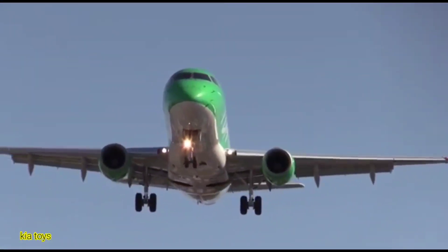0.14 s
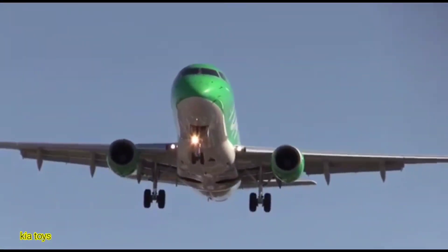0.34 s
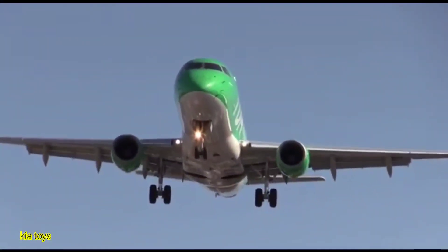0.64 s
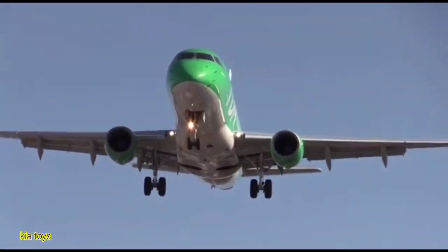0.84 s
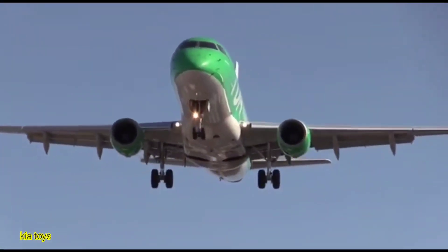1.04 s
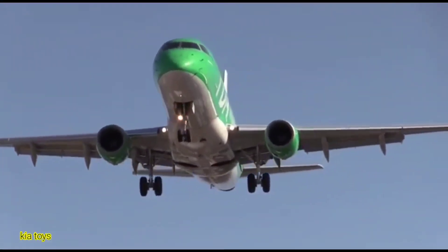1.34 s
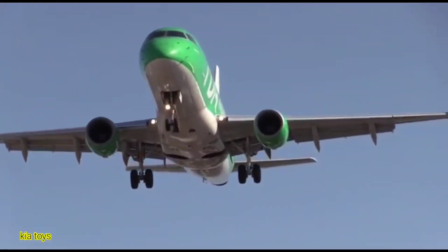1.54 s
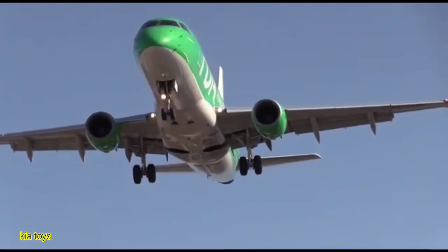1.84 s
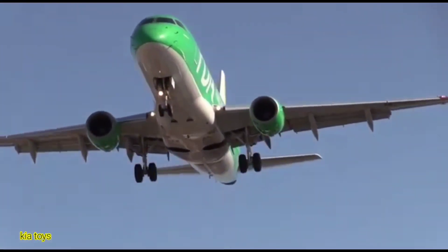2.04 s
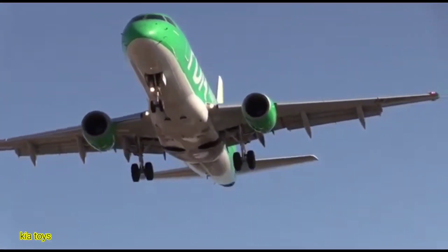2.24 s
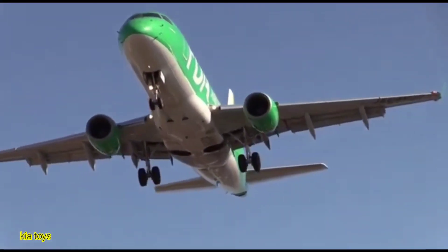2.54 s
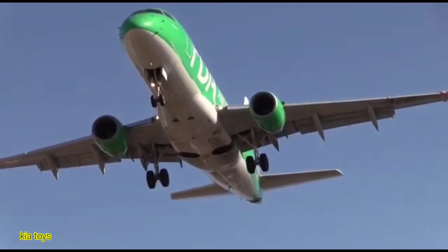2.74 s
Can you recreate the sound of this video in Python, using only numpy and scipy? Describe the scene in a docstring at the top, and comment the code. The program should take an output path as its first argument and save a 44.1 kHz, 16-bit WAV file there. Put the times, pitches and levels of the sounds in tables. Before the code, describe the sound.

A jet airliner passes low overhead, roaring and whining, with wind gusts thumping the microphone

```python
"""Under the approach path of an airport, a jet airliner passes low overhead of a two-port microphone.
Its roar, rush and hiss are turbulent noise that swells, fades and brightens as it nears, with an echo
off the ground. Beating fan tones and turbine tones are wavering sines that sag slightly in pitch.
Wind buffets the microphone as low noise, and the two hardest gusts thump and tick; the aircraft's
level dips after each."""
import sys
import numpy as np
from scipy import signal
from scipy.fft import rfft, irfft
from scipy.io import wavfile
from scipy.ndimage import uniform_filter1d

SR = 44100
rng = np.random.default_rng(int(sys.argv[2]) if len(sys.argv) > 2 else 0)


def store_pcm(level_fs):
    """Save levels as 16-bit WAV."""
    pcm = np.round(np.clip(level_fs, -1, 1) * 32767).astype(np.int16)
    wavfile.write(sys.argv[1], SR, np.atleast_2d(pcm).T)


N = 127890
T = np.arange(N) / SR  # seconds

# Treble lost in the air on the way, above the pivot; a loss below zero lifts the treble.
# Each row: time in seconds, loss in dB per kHz.
AIR_LOSS_CURVE = [(0, 6), (.55, 4), (.9, 6), (1.2, 2.5), (1.5, 2), (1.9, 2.5), (2.05, 2.2), (2.25, 1.1),
                  (2.55, 0.33), (2.9, -1)]
HISS_PIVOT_HZ = 2980
# Shape of the steady hiss, also used for the ticks. Each row: frequency in Hz, relative dB per Hz.
FLOOR_SPECTRUM = [(5000, 5.5), (15000, -5.5)]
HIGH_SHIFT = 0.4  # share of the pitch shift that the high tones and the fans' octave take


def amp(db):
    """Decibels to gain."""
    return 10 ** (np.asarray(db) / 20)


def unit(x):
    """Scales to an rms of one."""
    return x / np.sqrt(np.mean(abs(x) ** 2) + 1e-20)


def curve(points, t=T):
    """Reads a table along time."""
    return np.interp(t, *np.transpose(points))


def colour(points, hz):
    """Reads a table along log frequency."""
    table_hz, value = np.transpose(points)
    return np.interp(np.log(hz + 1), np.log(table_hz), value)


def drift(rate_hz):
    """Slow random motion of rms one: noise under a bell-shaped low-pass, without its mean."""
    hz = np.fft.rfftfreq(N, 1 / SR)
    low_pass = np.exp(-.5 * (hz / rate_hz) ** 2) * (hz > 0)
    return unit(irfft(rfft(rng.standard_normal(N)) * low_pass, N))


def swell(s, spread_s, db):
    """A bell-shaped rise and fall that peaks at s seconds."""
    return amp(db) * np.exp(-.5 * ((T - s) / spread_s) ** 2)


def pair(mid, side, likeness):
    """Left and right signals of a given likeness."""
    c = np.clip(likeness, 0, 1)
    return np.sqrt((1 + c) / 2) * mid + np.sqrt((1 - c) / 2) * np.array([side, -side])


def flow(spectrum, patchy_db, absorbed=False, size=1024):
    """Turbulent noise in drifting patches, combed by the ground echo and dulled by the air if asked."""
    # Left-right likeness. Each row: frequency in Hz, likeness from 0 to 1.
    likeness = [(100, 0.99), (500, 1), (2000, 0.96), (5200, 0.98), (6000, .9995)]
    # Delay of the echo off the ground. Each row: time in seconds, delay in ms.
    echo_delay = [(1.5, 1.5), (2.25, 2.15), (2.55, 2.8), (2.9, 3.34)]
    echo_share, echo_top_hz = 0.13, 1390

    hop = size // 4
    t = np.arange(N // hop + 5) * hop / SR
    hz = np.fft.rfftfreq(size, 1 / SR)
    a, b, c, d, patches = rng.standard_normal((5, len(t), len(hz)))
    patches = uniform_filter1d(patches, size=12, axis=0)  # smooth along time
    patches = unit(uniform_filter1d(patches, size=9, axis=1))  # and along frequency
    z = pair(a + 1j * b, c + 1j * d, colour(likeness, hz))
    z = z * amp(colour(spectrum, hz) + patchy_db * patches)

    # the delayed copy is weaker towards the treble
    echo_gain = echo_share / (1 + (hz / echo_top_hz) ** 2)
    delay_s = curve(echo_delay, t)[:, None] / 1000
    z = z * abs(1 + echo_gain * np.exp(2j * np.pi * hz * delay_s))
    if absorbed:
        khz_above = np.maximum(hz - HISS_PIVOT_HZ, 0) / 1000
        z = z * amp(-curve(AIR_LOSS_CURVE, t)[:, None] * khz_above)
    noise = signal.istft(z.transpose(0, 2, 1), nperseg=size, noverlap=size - hop)[1]
    return unit(noise[:, :N])


def tone(hz, width_hz, shift, flutter=0.5):
    """A blade tone with a wavering pitch, beating against its own scattered copies."""
    # Closing speed as a pitch shift, of which each tone takes its share.
    # Each row: time in seconds, shift in per cent.
    doppler = [(0, 0.47), (.5, 0.33), (1.0, 0.17), (1.9, 0.095), (2.4, -.25), (2.9, -0.56)]
    scatter_hz = 13  # how fast the air scatters the tones

    waver = .5 * width_hz * drift(2 * width_hz)
    pitch = hz * (1 + shift * curve(doppler) / 100) + waver
    paths = unit(1 + flutter * (drift(scatter_hz) + 1j * drift(scatter_hz)))
    turns = np.cumsum(pitch) / SR + rng.random()
    return np.sqrt(2) * (paths * np.exp(2j * np.pi * turns)).real


def airframe():
    """The low roar of flaps, gear and exhaust, the hollow howl above it and the exhaust rumble."""
    # Levels through the pass; the rumble opens up as the engines come over.
    # Each row: time in seconds, level in dB (the howl sounds 0.66 dB under its rows).
    roar_level = [(0, -29), (.12, -28.5), (.24, -24.5), (.3, -35.5), (.42, -27.5), (.62, -29.5),
                  (.7, -37.5), (1.0, -32.5), (1.25, -34), (1.6, -27.5), (1.78, -24.5), (2.1, -23),
                  (2.5, -23.5), (2.9, -24)]
    howl_level = [(0, -25.5), (.2, -26), (.29, -32), (.48, -26.5), (.62, -29.5), (.7, -37), (1.3, -31.5),
                  (1.65, -26), (1.95, -20), (2.26, -18.5), (2.45, -27.5), (2.62, -29.5), (2.9, -25.5)]
    rumble_level = [(1.1, -45.5), (1.45, -36), (1.8, -34.5), (2.3, -39.5), (2.55, -31.5), (2.9, -29)]
    # Their spectra. Each row: frequency in Hz, relative dB per Hz.
    roar_spectrum = [(40, 2.5), (110, -5), (170, -1), (250, 1.5), (370, 3), (480, -5.5), (700, -23),
                     (1500, -68)]
    howl_spectrum = [(200, -78), (350, -5), (470, 1), (650, 0.5), (750, -6), (880, -22.5), (1200, -20.5),
                     (2500, -69.5)]
    rumble_spectrum = [(50, -29.5), (100, -14), (150, -7.5), (210, -11.5), (300, -10.5), (450, -25),
                       (1000, -68)]

    roar = amp(curve(roar_level)) * flow(roar_spectrum, patchy_db=1.0)
    howl = amp(curve(howl_level) - 0.66) * flow(howl_spectrum, patchy_db=1.0)
    rumble = amp(curve(rumble_level)) * flow(rumble_spectrum, patchy_db=4.5)
    return roar + howl + rumble


def engines():
    """The mid-range rush, the intake hiss with the turbine tones riding on it, and the fans."""
    # Levels through the pass. Each row: time in seconds, level in dB
    # (the rush sounds 2 dB and the hiss 1.08 dB over its rows).
    rush_level = [(0, -36.5), (.09, -31.5), (.23, -28), (.29, -32), (.42, -25.5), (.57, -29), (.635, -29.5),
                  (.67, -36), (.85, -36), (1.08, -40), (1.33, -41), (1.64, -30), (1.79, -24), (1.95, -21),
                  (2.05, -22), (2.12, -24.5), (2.4, -27.5), (2.9, -28)]
    hiss_level = [(0, -45.5), (.12, -38), (.21, -43), (.3, -53), (.51, -42.5), (.63, -45.5), (.7, -52),
                  (.96, -39), (1.08, -49.5), (1.2, -50), (1.58, -42), (1.74, -31.5), (1.87, -34),
                  (2.01, -27), (2.06, -27), (2.16, -34), (2.4, -32.5), (2.7, -31.5), (2.9, -35)]
    # Their spectra. Each row: frequency in Hz, relative dB per Hz.
    rush_spectrum = [(400, -8.5), (750, 2.5), (950, 0.5), (1300, -0.5), (1750, -2), (2150, -7), (2450, -16),
                     (3200, -21.5), (6000, -74)]
    hiss_spectrum = [(1200, -16.5), (2200, 4.5), (2600, -1.5), (3200, -2), (3900, -5.5), (5400, -9),
                     (6300, -17), (8500, -23.5), (10500, -32.5), (15000, -50.5)]
    # Level added to all turbine tones. Each row: time in seconds, level in dB.
    beam = [(.7, -6), (.9, 0), (1.4, -4), (1.62, -1), (2.03, -2), (2.2, -2), (2.45, 3), (2.9, 3)]

    rush = amp(2.0) * flow(rush_spectrum, patchy_db=1.0)
    hiss = amp(1.08) * flow(hiss_spectrum, patchy_db=2.0, absorbed=True)
    hiss = hiss + amp(curve(beam)) * turbine()
    return amp(curve(rush_level)) * rush + amp(curve(hiss_level)) * hiss + fans()


def turbine():
    """High fan and turbine tones, dulled by a share of the treble loss in the air."""
    # Each row: pitch in Hz before the shift, level in dB before the air loss, width of the waver in Hz.
    high_tones = [(5375, -27, 30), (5570, -30, 35), (7588, -28.5, 35), (9745, -35, 45), (11930, -46, 55)]
    loss_share = 0.43

    total = 0
    for hz, db, width_hz in high_tones:
        loss_db = loss_share * curve(AIR_LOSS_CURVE) * max(hz - HISS_PIVOT_HZ, 0) / 1000
        total = total + tone(hz, width_hz, HIGH_SHIFT) * amp(db - loss_db)
    return total


def fans():
    """Two fans at slightly different speeds beat; their octave and a lower whine come and go."""
    # The two main whines. One row each: pitch in Hz before the shift, width of the waver in Hz,
    # share of the pitch shift.
    fan_tone = (2177, 8, 0.9)
    lower_tone = (1836, 9, .2)
    # Strength of the fan tone, the lower whine and the octave, which fade in and out.
    # Each row: time in seconds, level in dB.
    fan_level = [(0, -49.5), (.13, -29.5), (.26, -54), (.48, -32.5), (.7, -53), (.92, -37.5), (1.15, -53.5),
                 (1.55, -47.5), (1.7, -35), (2.0, -28.5), (2.12, -43), (2.22, -35), (2.45, -37.5),
                 (2.55, -30.5), (2.68, -35.5), (2.9, -31.5)]
    lower_level = [(0, -41.5), (.3, -48.5), (.6, -33), (.72, -55.5), (1.06, -39), (1.2, -60), (1.45, -45),
                   (1.72, -44), (1.83, -26.5), (1.96, -25.5), (2.05, -28.5), (2.14, -39), (2.35, -31.5),
                   (2.42, -38.5), (2.58, -30.5), (2.9, -44.5)]
    octave_level = [(.3, -74), (.5, -66.5), (.75, -73), (.95, -55), (1.08, -74), (1.6, -54.5), (2.0, -48),
                    (2.2, -55), (2.9, -44)]
    second_fan, beat_hz = 0.5, 14  # relative strength, and how far below the first it sounds

    hz, width_hz, shift = fan_tone
    first = tone(hz, width_hz, shift, flutter=.25)
    second = second_fan * tone(hz - beat_hz, width_hz, shift, flutter=0.19)
    both = amp(curve(fan_level)) * unit(first + second)
    # the octave sounds at the sum of the two fan pitches
    octave = amp(curve(octave_level)) * tone(2 * hz - beat_hz, 3 * width_hz, HIGH_SHIFT, flutter=.8)
    return both + octave + amp(curve(lower_level)) * tone(*lower_tone)


def ports(x):
    """Each microphone port colours the sound from the sky a little differently."""
    # Left minus right. Each row: frequency in Hz, difference in dB.
    balance = [(160, 0), (330, 1.5), (860, 0), (1200, 3), (1650, -0.6), (2250, 1.5), (2620, -3),
               (3050, 0.1)]
    # Lead of the left. Each row: frequency in Hz, phase in radians.
    lead = [(300, -0.09), (780, -0.2), (1030, 0.18), (1380, -.3), (1810, 0), (2410, -.28), (3190, .14),
            (3960, -.24), (4390, 0)]

    hz = np.fft.rfftfreq(N, 1 / SR)
    half = np.array([[.5], [-.5]])  # each port takes half the difference
    response = amp(half * colour(balance, hz)) * np.exp(1j * half * colour(lead, hz))
    return irfft(rfft(x) * response, N)


def wind():
    """Low buffeting at the microphone whose strength follows the gusts."""
    # Steady wind, before the band limit. Each row: time in seconds, level in dB.
    steady = [(0, -29), (.18, -17.5), (.3, -23), (.42, -19), (.6, -17), (.72, -26.5), (1.1, -19.5),
              (1.3, -25.5), (1.45, -23.5), (1.6, -25.5), (1.95, -26.5), (2.15, -17), (2.32, -29),
              (2.42, -34), (2.6, -51), (2.9, -36)]
    # Gusts, before the band limit. Each row: peak in seconds, spread in seconds, level in dB.
    gusts = [(0.177, 0.0098, -11.5), (0.236, 0.017, -8.5), (0.642, 0.0086, -10.5), (0.417, 0.008, -10),
             (0.531, 0.015, -9.5), (0.587, 0.0077, -10.5), (0.814, 0.0058, -11), (0.847, 0.0083, -10.5),
             (0.983, 0.024, -11.5), (1.055, 0.015, -10), (1.48, 0.013, -20), (2.104, 0.016, -12),
             (2.318, 0.014, -18)]
    # Shape of the buffeting. Each row: frequency in Hz, relative dB per Hz.
    wind_spectrum = [(15, -35.5), (30, -22.5), (50, -0.5), (75, 4.5), (105, 0.5), (145, -9), (200, -12.5),
                     (400, -24), (1000, -56), (4000, -110)]
    # Wind that differs between the ports. Each row: frequency in Hz, dB against the shared shape.
    side_spectrum = [(30, -20.5), (70, -17), (110, -18), (170, -9.5), (260, 0.5), (500, -5.5)]
    band_hz = [16, 200]  # buffeting rolls off outside

    hz = np.fft.rfftfreq(N, 1 / SR)
    shared, apart = rfft(rng.standard_normal((2, N))) * amp(colour(wind_spectrum, hz))
    eddies = irfft(shared, N)
    side = irfft(apart * amp(colour(side_spectrum, hz)), N)
    # level out the shared eddies' own swells, so that the tables set the strength
    power = abs(signal.hilbert(eddies)) ** 2
    size = np.sqrt(uniform_filter1d(uniform_filter1d(power, size=600), size=600))
    strength = np.sqrt(amp(curve(steady)) ** 2 + sum(swell(*row) ** 2 for row in gusts))
    buffet = strength * (unit(eddies / size) + np.array([side, -side]) / np.std(eddies))
    return signal.sosfilt(signal.butter(3, band_hz, "band", fs=SR, output="sos"), buffet)


def thumps():
    """The hardest gusts: a few deep swings of pressure, with noisy ticks near their height."""
    # Each row: peak in seconds, spread in seconds, peak level in dB, pitch in Hz.
    hardest = [(.249, .013, -1, 84), (.655, .011, 0, 88)]
    # Ticks as they overload the microphone. Each row: peak in seconds, level in dB.
    ticks = [(.246, -52), (.649, -58), (.658, -52)]
    tick_spread_s = .0014

    booms = 0
    for s, spread_s, db, hz in hardest:
        booms = booms + swell(s, spread_s, db) * np.cos(2 * np.pi * hz * (T - s))
    tick_strength = sum(swell(s, tick_spread_s, db) for s, db in ticks)
    return booms + tick_strength * flow(FLOOR_SPECTRUM, patchy_db=-3.5)


def floor():
    """Faint steady hiss that swells once into a brief fizz."""
    fizz = swell(1.357, spread_s=.011, db=-57)
    return (amp(-77.5) + fizz) * flow(FLOOR_SPECTRUM, patchy_db=0)


def scene():
    """The aircraft overhead and the wind at the microphone."""
    aircraft = ports(airframe() + engines())
    return aircraft + wind() + thumps() + floor()


def record(dry):
    """Overload clips the peaks just under full scale, then a low-pass limits the band."""
    edge_hz = 15150
    clipped = np.clip(dry, -.98, .98)
    low_pass = signal.firwin(511, edge_hz, window=("kaiser", 9), fs=SR)
    return signal.oaconvolve(clipped, low_pass[None], "same")


dry = scene()
out = record(dry)
store_pcm(out)
```